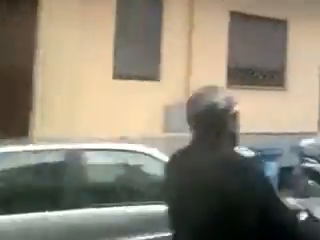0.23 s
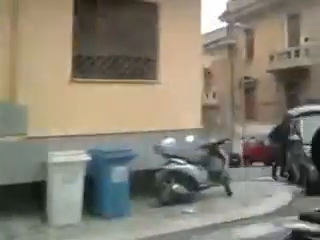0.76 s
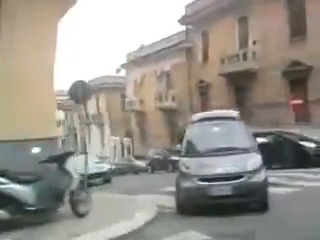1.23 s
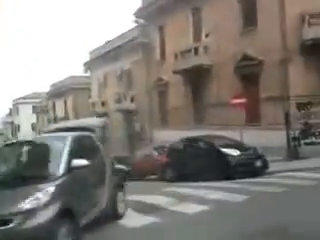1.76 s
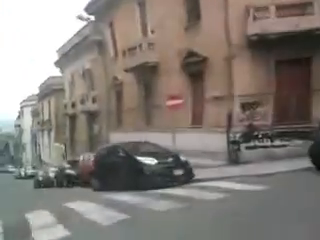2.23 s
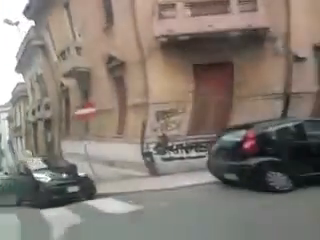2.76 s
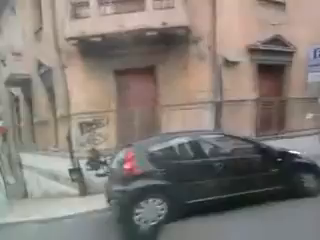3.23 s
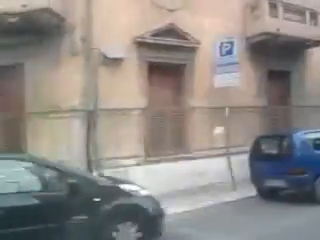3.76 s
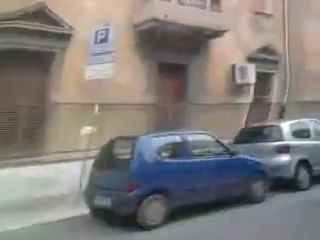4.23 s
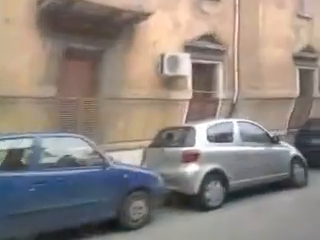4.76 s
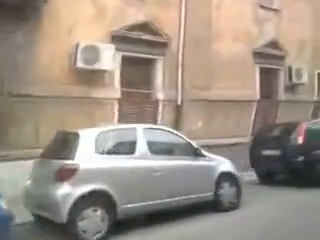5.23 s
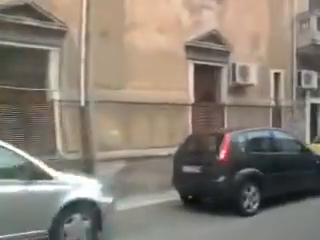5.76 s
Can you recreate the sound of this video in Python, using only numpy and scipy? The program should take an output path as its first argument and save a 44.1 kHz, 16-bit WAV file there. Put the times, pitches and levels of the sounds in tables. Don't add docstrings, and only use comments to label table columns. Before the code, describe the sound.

A close, muffled car cabin captured by a cheap phone with telephone-like bandwidth. Loose panels clatter violently at once over boom, tyre roar and air hiss. The ride smooths and the gear hum drifts lower and fainter, with small knocks and plastic squeaks. Before halfway the hum rises quickly and strengthens; another cluster of harsh rattles follows, then it holds nearly steady, sinking slightly to the end.

```python
import sys
import numpy as np
from scipy import signal
from scipy.fft import rfft, irfft, next_fast_len
from scipy.io import wavfile
from scipy.ndimage import uniform_filter1d, map_coordinates

SR = 44100
rng = np.random.default_rng(int(sys.argv[2]) if len(sys.argv) > 2 else 0)


def rack_gain(trim_db):
    fader = np.asarray(trim_db, float)
    return 10 ** (fader / 20)


def pcm_store(signal):
    levels = np.round(np.clip(np.atleast_2d(signal), -1, 1) * 32767)
    wavfile.write(sys.argv[1], SR, levels.astype(np.int16).T)


N = 264598


def unit(x):
    return x / np.sqrt(np.mean(x ** 2) + 1e-20)


def along(points, hz):
    f, v = np.transpose(points)
    return np.interp(np.log(hz + 1), np.log(f + 1), v)


def curves(rows):
    s, *cols = np.transpose(rows)
    return [np.interp(np.arange(N) / SR, s, c) for c in cols]


def wobble(rate_hz):
    coarse = np.arange(0, N + 64, 64)
    knots = rng.standard_normal(int(N * 60 / SR) + 9)
    smooth = map_coordinates(knots, [coarse * min(rate_hz, 60) / SR])
    return np.interp(np.arange(N), coarse, smooth)


def filtered(x, response):
    m = next_fast_len(N + SR // 2)
    return irfft(rfft(x[:N], m) * response(np.fft.rfftfreq(m, 1 / SR)), m)[:N]


def modes(table):
    def response(f):
        total = 0
        for k, (hz, width_hz, db) in enumerate(table):
            resonance = 1j * f * width_hz / (hz * hz - f * f + 1j * f * width_hz)
            total = total + (-1) ** k * rack_gain(db) * resonance
        return total
    return response


def rush(spectrum, patchy_db, source=0):
    z = signal.stft(rng.standard_normal(N) + source, nperseg=512)[2]
    field = uniform_filter1d(rng.standard_normal(z.shape), size=5, axis=0)
    field = uniform_filter1d(field, size=4, axis=1)
    x = signal.istft(z * rack_gain(patchy_db * unit(field)), nperseg=512)[1][:N]
    return unit(filtered(x, lambda hz: rack_gain(along(spectrum, hz))))


# time in seconds, gear mesh in Hz, mesh level in dB, engine order in Hz,
# order level in dB.
DRIVE = [(0, 320.5, -19.5, 224, -30.5), (.45, 310, -26.5, 217, -29.5), (.7, 303.2, -26, 210, -18.5),
         (1.15, 296.4, -23, 206, -22), (1.32, 292.5, -33.5, 204, -34), (1.7, 281.3, -27.5, 200, -33),
         (2.1, 296.8, -30, 208, -22.5), (2.35, 303.9, -35, 213, -21.5), (2.55, 332, -20, 232, -22),
         (2.72, 358.9, -15, 246, -17.5), (2.87, 365.1, -17.5, 252, -14.5), (3.3, 358, -17, 250, -16),
         (3.7, 357.2, -18.5, 248.5, -19.5), (4.1, 351.2, -18, 247, -14.5), (4.6, 351.4, -15.5, 247, -16),
         (4.85, 346.2, -19.5, 244, -20.5), (5.4, 343.2, -21.5, 243, -19), (6, 342.4, -21.5, 236, -25.5)]


def whirl(turns, db, flutter_db):
    return np.sqrt(2) * rack_gain(db + flutter_db * wobble(18)) * np.sin(2 * np.pi * turns)


def drive():
    mesh_hz, mesh_db, order_hz, order_db = curves(DRIVE)
    third_db = -41.5 + 0.29 * (mesh_db + 24.5)
    gear = np.cumsum(mesh_hz * (1 + .003 * wobble(25))) / SR
    crank = np.cumsum(order_hz * (1 + .003 * wobble(25))) / SR
    whine = whirl(gear, mesh_db, 2.2)
    whine += whirl(2 * gear, third_db + 1.5, 2.4) + whirl(3 * gear, third_db, 3)
    engine = whirl(crank, order_db + .5, 1.9) + whirl(crank * 4 / 5, order_db - 12.5, 3.5)
    firings = crank / 5
    return whine + engine, firings


# time in seconds, peak in dB.
JOLTS = [(0, -6), (.19, -9), (0.301, -13.5), (.43, -19.5), (.58, -13.5), (0.688, -9.5), (.85, -14.5),
         (0.911, -13.5), (1.061, -12.5), (1.16, -16.5), (1.311, -17.5), (1.49, -16), (1.621, -17),
         (1.93, -18.5), (2.12, -16), (2.4, -14.5), (2.51, -13), (2.86, -10.5), (2.981, -16), (3.06, -12.5),
         (3.14, -10.5), (3.24, -12.5), (3.631, -10), (3.97, -14), (4.22, -15.5), (4.47, -14), (5.08, -13),
         (5.35, -18), (5.48, -15), (5.61, -14)]
JOLT_RISE_S, JOLT_FALL_S = 0.03, 0.015


def heave():
    t, mesh_db = np.arange(N) / SR, curves(DRIVE)[1]
    steady_db = -20.5 + 0.25 * (mesh_db + 23.5) + 1.5 * wobble(12)
    swells = [db - 6 * np.maximum((s - t) / JOLT_RISE_S, (t - s) / JOLT_FALL_S) for s, db in JOLTS]
    return np.maximum(steady_db, np.max(swells, axis=0))


# frequency in Hz, density in dB per Hz.
BOOM = [(20, -43.5), (60, -22), (115, -20), (150, -9.5), (185, -1.5), (225, 2.5), (270, -1.5), (320, -13),
        (420, -22.5), (700, -61)]
ROAR = [(150, -38.5), (290, -2), (385, -3), (450, 1), (547, -7), (696, -6.5), (811, -11), (1030, -11.5),
        (1300, -19), (1600, -28.5), (2500, -51.5)]
HISS = [(600, -29), (1200, -3), (1500, 2), (2000, -1.5), (3000, -3.5), (4000, -6.5)]
# time in seconds, tyre roar in dB, air rush in dB.
ROAD = [(0, -22.5, -30.5), (.3, -18.5, -32.5), (.6, -14.5, -29.5), (.85, -24.5, -33), (1.1, -25, -36.5),
        (1.6, -24, -37.5), (2.1, -28, -40.5), (2.35, -24, -38), (3.2, -24, -36), (3.6, -19, -35),
        (4.1, -23, -34.5), (4.7, -24, -35), (5.3, -23, -35), (6, -24, -36.5)]


def cabin(firings):
    boom_db, (roar_db, hiss_db) = heave(), curves(ROAD)
    pulses = np.diff(np.floor(firings), prepend=0) * rack_gain(2.4 * wobble(50))
    beat = 1 + 0.078 * np.cos(2 * np.pi * firings)
    shake = wobble(9)
    boom = rack_gain(boom_db + 3.0) * rush(BOOM, patchy_db=1.9, source=0.45 * unit(pulses))
    roar = rack_gain(roar_db + 2.06 + 0.56 * shake) * beat * rush(ROAR, patchy_db=1.2)
    hiss = rack_gain(hiss_db + 7.0 + .7 * shake + 0.37 * wobble(45)) * beat * rush(HISS, patchy_db=2.56)
    return boom + roar + hiss


# time in seconds, peak in dB, door panel part in dB,
# bright part in dB.
BUMPS = [(.124, -10.5, 0, -14.5), (.143, -4, 0.5, -16), (.242, -7, -10, -17), (.298, -8.5, -16, -12),
         (.351, -1.5, -1, -19.5), (.379, -4.5, -3, -16.5), (.404, -1.5, -4, -16), (0.456, -2.5, 2, -21.5),
         (0.483, -2, -7.5, -28.5), (.508, -3.5, -3, -17.5), (.535, -1, -11.5, -11), (.574, -12, 1, -8),
         (.625, -7, 1, -10), (.645, -7.5, -2.5, -13.5), (.738, -12, -8.5, -17), (2.357, -13, -10, -17),
         (2.762, -13.5, -4, -13), (2.98, -9, -13, -12), (3.45, -12, -5.5, -22.5), (3.524, -7.5, -0.5, -13),
         (3.558, -1, -7.5, -19), (3.583, -5.5, -7.5, -25), (3.64, -14.5, -5, -16), (3.696, -2, -1.5, -19.5),
         (3.719, -2, -10.5, -29.5), (3.755, -10, -2, -19), (3.786, -5, -1, -15), (3.885, -11, -4.5, -13),
         (4.161, -9.5, -2.5, -23), (4.647, -13.5, -9.5, -12.5)]
# time in seconds, peak in dB, bright part in dB.
KNOCKS = [(0.035, -12, -9), (.086, -14.5, -9.5), (.684, -10.5, -12.5), (.76, -15, -7.5), (.838, -13, -4),
          (.942, -24, -5), (1.063, -17, -10), (1.514, -18, -7.5), (1.546, -21.5, -2), (1.6, -20, -15),
          (1.71, -22.5, -10), (1.853, -21, -4), (1.925, -16.5, -5.5), (2.028, -13.5, -21),
          (2.059, -18.5, -17), (2.521, -25.5, -15.5), (2.582, -19.5, -10.5), (2.633, -13, -16),
          (2.67, -16.5, -15), (3.007, -21.5, -4.5), (3.046, -18, -10.5), (3.155, -18.5, -24),
          (3.425, -20, -10), (3.82, -13, -13.5), (3.929, -24.5, -9.5), (4.317, -18, -15.5),
          (4.838, -16.5, -13), (4.965, -19.5, -12), (5.546, -20.5, -12)]
# frequency in Hz, width in Hz,
# level in dB.
DOOR = [(451.7, 32, 1.5), (503, 45, -3), (575.3, 18, 3.5), (665, 97, -6)]
DASH = [(754, 91, -3.5), (868, 120, -2.5), (971, 39, 1.5), (1109, 37, -4), (1261, 44, -3.5),
        (1431, 90, -13)]
CLIPS = [(1700, 160, -1), (2280, 570, -3), (2870, 530, -3.5), (3510, 380, -0.5)]
KNOCK_DOOR_DB, THUMP_DB, CHATTER_S = 0.9, -20, .024


def bumps():
    t = np.arange(SR // 6) / SR
    dash, door, clip, floor = np.zeros((4, N + SR))
    knocks = [(s, db, KNOCK_DOOR_DB, bright_db) for s, db, bright_db in KNOCKS]
    blow = 1 + 1.2 * np.exp(-t / 0.0034)
    for s, db, door_db, bright_db in [*BUMPS, *knocks]:
        decay_db = 60 * np.maximum(t - CHATTER_S, 0) / 0.054
        fade = rack_gain(db - decay_db) * (1 - np.exp(-t / 0.0016))
        chatter = rng.standard_normal((3, len(t))) * fade * blow
        start = round((s - .003) * SR)
        at = slice(start, start + len(t))
        dash[at] += chatter[0]
        door[at] += rack_gain(door_db) * chatter[1]
        clip[at] += rack_gain(bright_db) * chatter[2]
        floor[at] += rack_gain(THUMP_DB) * fade * np.sin(2 * np.pi * rng.normal(200, 22) * t)
    panels = rack_gain(9.0) * filtered(dash, modes(DASH)) + rack_gain(13.5) * filtered(door, modes(DOOR))
    return panels + rack_gain(4.5) * filtered(clip, modes(CLIPS)) + floor[:N]


# time in seconds, length in seconds, frequency in Hz, width in Hz, level in dB.
SQUEAKS = [(1.815, .1, 2800, 80, -33), (1.81, .04, 2960, 130, -36), (1.92, .035, 2100, 250, -34),
           (2.755, .045, 3360, 150, -30), (2.36, .04, 3400, 300, -33), (2.975, .045, 1800, 220, -25),
           (4.62, .04, 2200, 150, -29.5), (2.12, .047, 455, 50, -23), (1.63, .33, 688, 16, -31),
           (.94, .025, 2600, 230, -32), (1.505, .03, 1270, 100, -30), (.835, .04, 3400, 300, -31),
           (3.87, .07, 1450, 150, -28)]


def squeaks():
    out, t = np.zeros(N + SR), np.arange(SR // 2) / SR
    ring_t = t[:2000]
    for s, length_s, hz, width_hz, db in SQUEAKS:
        ring = np.exp(-np.pi * width_hz * ring_t) * np.sin(2 * np.pi * hz * ring_t)
        rub = unit(signal.fftconvolve(rng.standard_normal(len(t) + 1999), ring, "valid"))
        swell = np.sin(np.pi * np.clip(t / length_s, 0, 1)) ** 0.24
        out[round(s * SR):][:len(t)] += rack_gain(db) * swell * rub
    return out[:N]


def scene():
    tones, firings = drive()
    return (tones + cabin(firings) + bumps() + squeaks())[None]


# time in seconds, peak in dB.
OVERLOADS = [(.1461, -43), (.1538, -45), (.3002, -36), (.3558, -45), (.3804, -41), (.4056, -34),
             (.4104, -37), (.4593, -38), (.4967, -37), (.5231, -41), (.5396, -33), (.5435, -40),
             (.5515, -36), (.5765, -41), (.6471, -33), (.6571, -35), (.7048, -46), (2.848, -49),
             (2.9807, -41), (3.0639, -49), (3.141, -47), (3.241, -52), (3.5314, -43), (3.5346, -44),
             (3.5656, -40), (3.5683, -39), (3.5753, -38), (3.6052, -43), (3.7041, -40), (4.4681, -48)]
NEIGHBOUR_S, NEIGHBOUR_DB = 0.0022, -15


def overload(wide):
    s, db = np.transpose(OVERLOADS)
    at = np.round(s * SR).astype(int)
    ticks = np.zeros(N)
    ticks[at] = -np.sign(wide[at]) * rack_gain(db + 14.5)
    gap = round(NEIGHBOUR_S * SR)
    ticks += rack_gain(NEIGHBOUR_DB) * (np.roll(ticks, gap) + np.roll(ticks, -gap))
    loudness = np.sqrt(np.abs(uniform_filter1d(wide ** 2, size=2000)))
    ticks += rack_gain(-88) * rng.standard_normal(N) * loudness * rack_gain(15)
    colour = [(1500, -20.0), (3500, 15.5), (5500, 5.5), (9700, -3.5), (10500, -14), (16000, -15)]  # Hz, dB
    return filtered(ticks, lambda hz: rack_gain(along(colour, hz)))


def band_limit(x):
    return signal.sosfilt(signal.butter(12, 15850, fs=SR, output="sos"), x)


# frequency in Hz, gain in dB.
PHONE = [(3100, 0), (3450, -7.5), (3750, -16), (4000, -18.5), (4600, -27), (4800, -24), (4950, -56.5),
         (5300, -100)]
PHONE_SR = 8000


def record(dry):
    loud = dry[0] / (1 + np.abs(dry[0] / .945) ** 14) ** (1 / 14)
    loud = loud * np.sin(np.pi / 2 * np.clip((N - np.arange(N)) / 300, 0, 1)) ** 2
    band = filtered(loud, lambda hz: hz < PHONE_SR / 2)
    mirror = 2 * band * np.cos(2 * np.pi * PHONE_SR * np.arange(N) / SR)
    wide = filtered(band + mirror, lambda hz: rack_gain(along(PHONE, hz)))
    mix = np.clip(wide + overload(wide), -.975, .975)[None]
    return band_limit(mix)


dry = scene()
out = record(dry)
pcm_store(out)
```